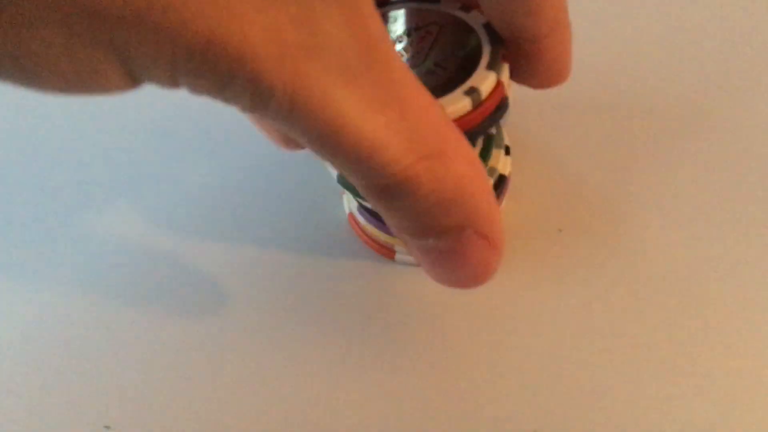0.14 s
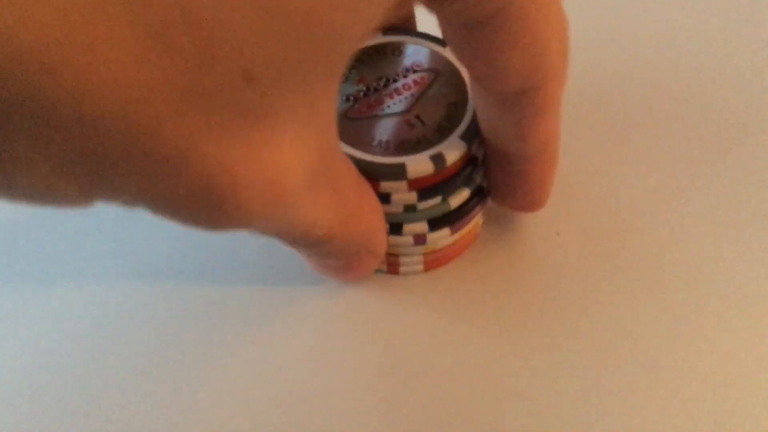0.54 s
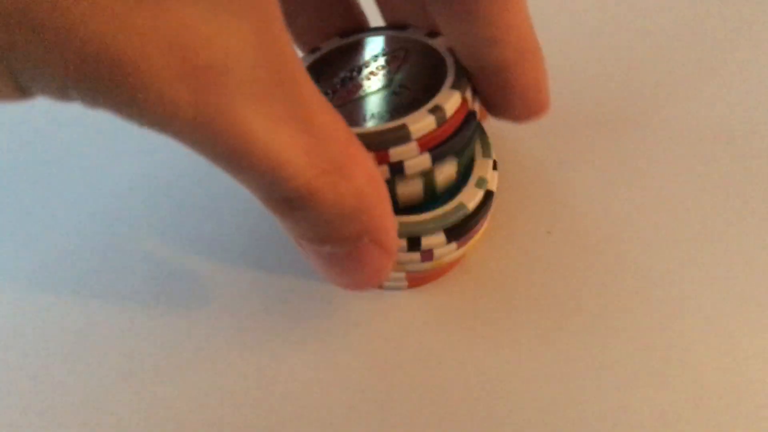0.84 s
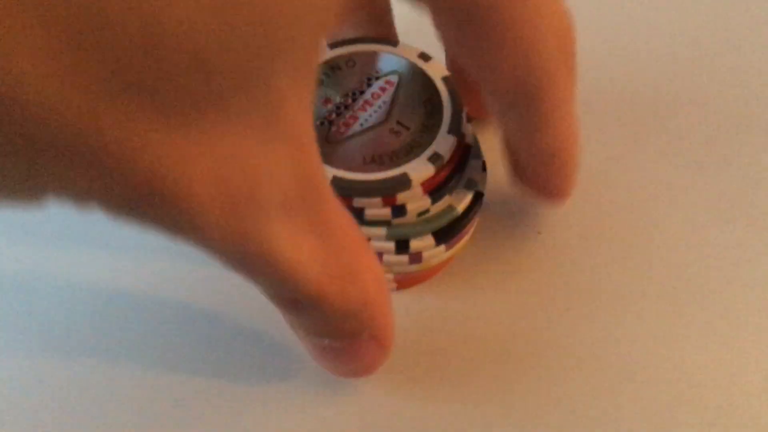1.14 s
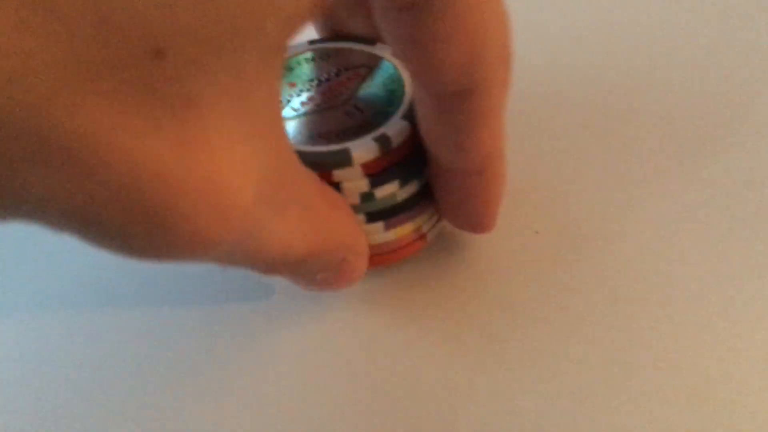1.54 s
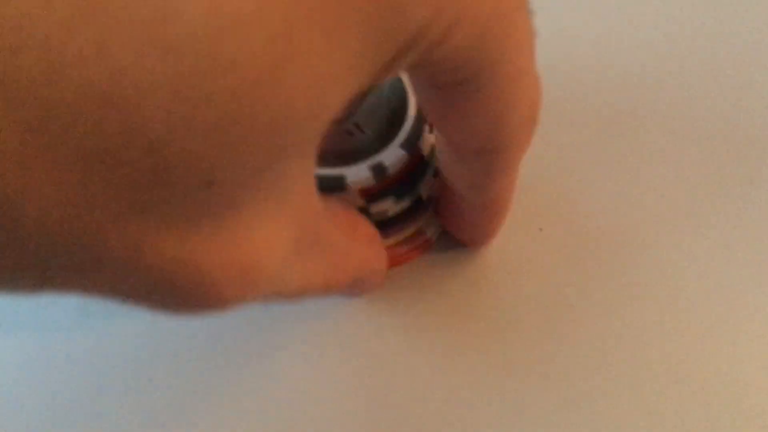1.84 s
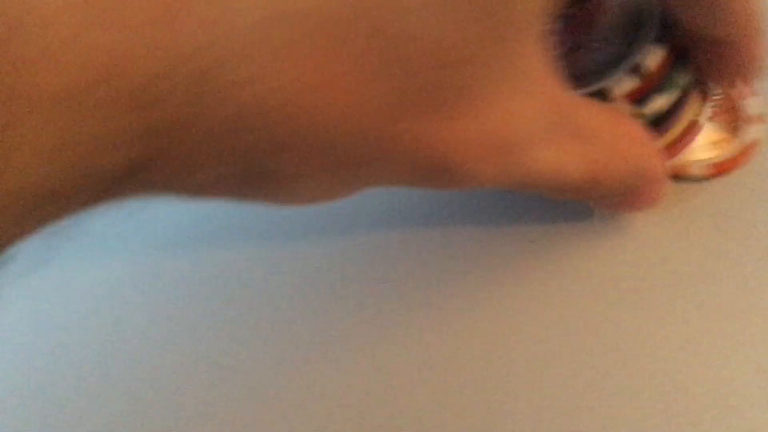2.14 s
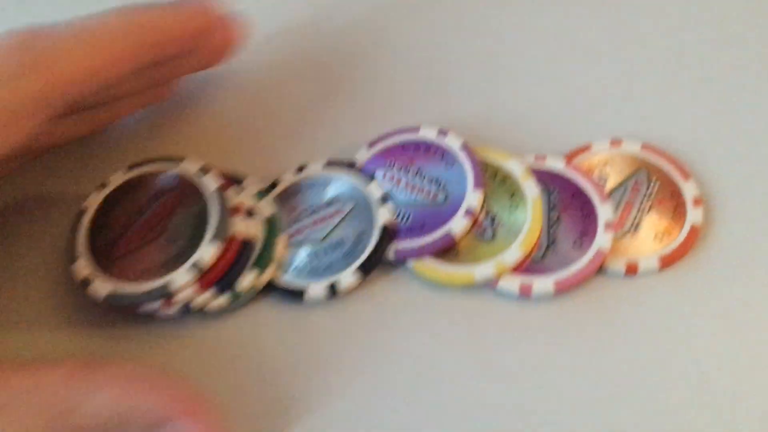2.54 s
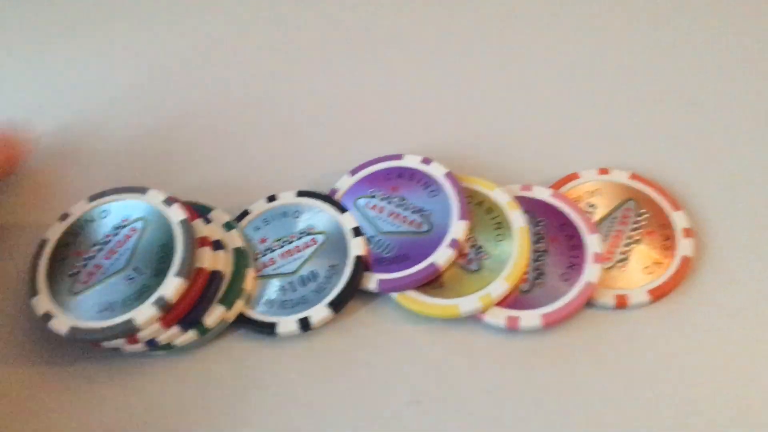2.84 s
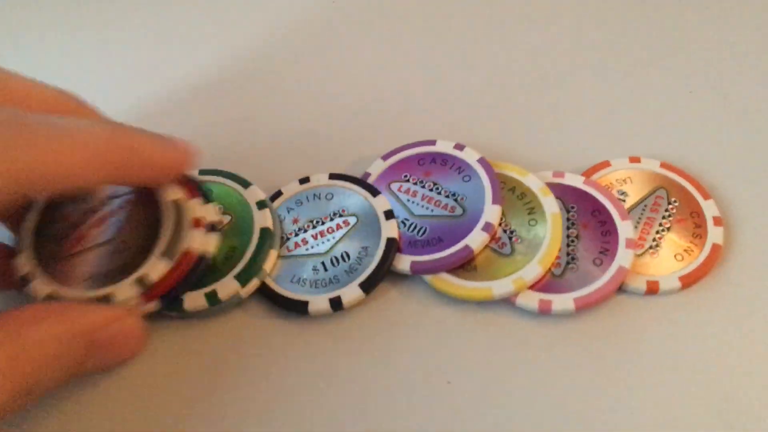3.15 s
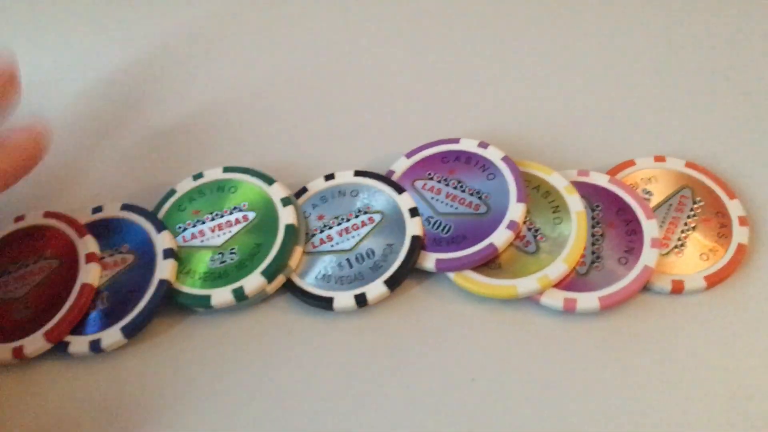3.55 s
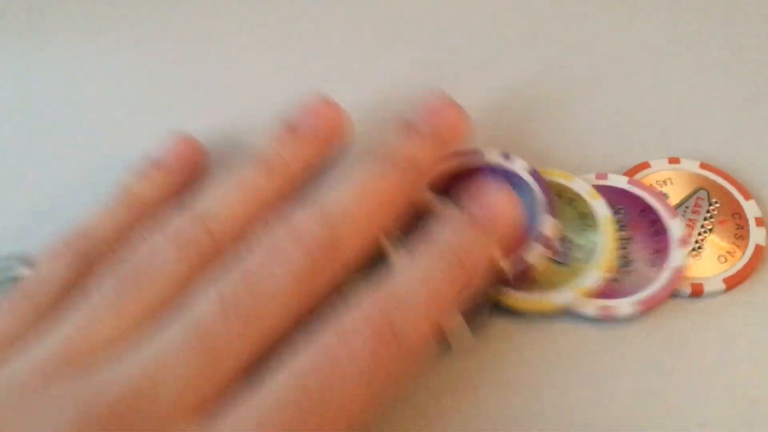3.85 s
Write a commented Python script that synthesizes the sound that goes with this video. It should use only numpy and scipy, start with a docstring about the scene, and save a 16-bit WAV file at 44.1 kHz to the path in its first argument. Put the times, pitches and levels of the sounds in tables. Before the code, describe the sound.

Poker chips clack on a table, close and dry in a small room. A dense, brightening clatter fills 0-0.37 s; looser clacks with stack thuds follow at 0.84-1.13, then a few knocks at 1.68-1.84. A hard crack at 2.2 leads into short scrapes and faint groans until 2.65. After quiet, chips spill in a tight ringing burst at 3.37-3.45, one click at 3.6, then rubbing from 3.8. Faint handling rumble beneath.

```python
"""Plastic poker chips clack on a table, close up, in a small room: a hand lifts a stack, lets the chips fall
back in three runs, smears the stack into a row, topples the rest and starts to gather them.
Each contact cracks as shaped noise, rings the chips and knocks the table top as damped modes.
Sliding chips rush as coloured noise, pressed ones groan as they stick and slip, the stack thuds as it settles.
Handling rumble, room air and a faint wavering hum lie beneath."""
import sys
import numpy as np
from scipy import signal
from scipy.fft import rfft, irfft, next_fast_len
from scipy.io import wavfile
from scipy.ndimage import uniform_filter1d, map_coordinates

SR = 44100
rng = np.random.default_rng(int(sys.argv[2]) if len(sys.argv) > 2 else 0)


def output_pcm(signal):
    """Save a mono or channel-first signal as 16-bit PCM at the path in sys.argv[1].

    Samples are clipped to [-1, 1] before scaling.
    """
    pcm = np.clip(np.atleast_2d(signal).T, -1, 1) * 32767
    wavfile.write(sys.argv[1], SR, np.round(pcm).astype(np.int16))


N = 176400  # length of the scene in samples
T = np.arange(SR // 3) / SR  # time within one contact [s]

# chip contacts; levels are energy over 1 ms, before the trims below:
# (time [s], table knock [dB], clack [dB], crack [dB], chip ring [dB], treble snap [dB], T60 of the impact [s])
CONTACTS = [(0.0339, -30, -26, -26, -38.5, -42.5, 0.004), (0.0852, -13, -19.5, -18, -40, -22, 0.015),
            (0.1316, -18, -14, -22.5, -29, -23, 0.016), (0.1531, -20, -35.5, -20.5, -23, -29.5, 0.095),
            (0.1746, -20, -13, -18, -16.5, -16, 0.033), (0.1791, -22, -17.5, -23, -13, -19.5, 0.052),
            (0.1869, -21.5, -36, -21.5, -28, -16.5, 0.031), (0.198, -20, -13, -16.5, -13, -20, 0.031),
            (0.2266, -20.5, -19.5, -22.5, -36.5, -28, 0.037),
            (0.2512, -18, -23.5, -21.5, -4.5, -20, 0.0085), (0.281, -17, -17.5, -17, -13, -16, 0.03),
            (0.3089, -19.5, -21.5, -20.5, -11.5, -16.5, 0.017),
            (0.3288, -15.5, -15, -15.5, -16.5, -22.5, 0.017), (0.3511, -19, -24, -19.5, -9.5, -16.5, 0.012),
            (0.354, -40.5, -36.5, -14, -7.5, -23, 0.0085), (0.3591, -38.5, -35.5, -15, -7, -15.5, 0.02014),
            (0.3629, -22.5, -26.5, -16, -7.5, -20, 0.013), (0.8375, -14, -15.5, -16, -20.5, -18.5, 0.0099),
            (0.8449, -21, -31, -26, -50.5, -32, 0.0077), (0.865, -17.5, -12.5, -22.5, -42.5, -23.5, 0.01),
            (0.902, -19, -13, -21.5, -34.5, -18.5, 0.0017), (0.9125, -30, -34.5, -33.5, -43.5, -35, 0.008),
            (0.9224, -22.5, -18.5, -22.5, -32, -24, 0.014), (0.9692, -19.5, -26, -27.5, -28.5, -32, 0.019),
            (1.002, -21.5, -16, -20.5, -16.5, -21.5, 0.0098), (1.0698, -20.5, -24, -23, -21.5, -22, 0.019),
            (1.098, -40, -21.5, -16, -15.5, -21, 0.029), (1.1043, -25.5, -29, -25, -29, -26.5, 0.0044),
            (1.1316, -29, -28.5, -21.5, -18.5, -26.5, 0.011),
            (1.68, -12.5, -21.5, -16, -21.5, -20.5, 0.012), (1.7432, -23, -18.5, -20, -26, -28, 0.0068),
            (1.8097, -16.5, -17, -19.5, -26, -25, 0.017), (1.8356, -31.5, -33.5, -34, -32.5, -35.5, 0.012),
            (2.2163, -10.5, -14.5, -14.5, -16, -14.5, 0.054), (2.2936, -11, -15.5, -19, -21, -16, 0.012),
            (2.3098, -28.5, -22, -22.5, -13, -21.5, 0.012),
            (2.3143, -20.5, -16.5, -19.5, -22.5, -31, 0.032), (2.3937, -15.5, -49.5, -29, -32, -31, 0.0065),
            (2.4092, -29, -28.5, -31, -50, -36, 0.007), (2.474, -21.5, -38.5, -37.5, -34.5, -45, 0.027),
            (2.5181, -29.5, -39.5, -36.5, -39, -52, 0.014), (3.3749, -16, -10.5, -30, -11, -22.5, 0.022),
            (3.378, -17.5, -21.5, -14, -9.5, -22, 0.063), (3.388, -17.5, -21, -33, -10.5, -15.5, 0.0072),
            (3.394, -18.5, -16, -26.5, -8, -19, 0.0075), (3.398, -17, -14, -9.5, -3.5, -10.5, 0.013),
            (3.4092, -17, -17, -15, -8.5, -17, 0.028), (3.4159, -34, -18.5, -16, -11, -26, 0.06),
            (3.4289, -23.5, -18.5, -27.5, -28, -39.5, 0.016), (3.452, -27, -24, -25, -33, -34.5, 0.021),
            (3.6074, -23, -16, -18.5, -30.5, -19, 0.022), (3.801, -30, -25.5, -28.5, -53, -43.5, 0.006),
            (3.859, -29, -24.5, -30.5, -38, -38, 0.021)]
# the stack settles heavily on the table: (time [s], level [dB])
STACK_THUDS = [(0.337, -29), (0.364, -21), (0.921, -17.5), (1.003, -20), (1.09, -22.5), (1.814, -14.5)]
# ringing modes of a chip: (frequency [Hz], relative level [dB])
CHIP_MODES = [(5950, -12), (6330, -14.5), (6590, -1), (7030, -7.5)]
# modes of the table top: (frequency [Hz], relative level [dB], T60 [s])
TABLE_MODES = [(261, -16.5, .14), (501, -11.5, 0.045), (781, -7, 0.043), (816, -5, 0.069),
               (1016, -8.5, 0.051), (1176, -2, 0.04), (1440, -4.5, 0.018), (1646, -15, 0.037),
               (2300, -8, 0.034)]
# slow modes of the whole table: (frequency [Hz], relative level [dB], T60 [s])
FRAME_MODES = [(91.1, 1, 0.35), (92.4, -1.5, 0.23), (131.3, -5, 0.23), (165.5, -7, 0.42), (216, -4, 0.17)]
# chips sliding; levels are before SLIDE_DB:
# (time [s], length [s], first level [dB], last level [dB], centre of the rub [Hz], brightness [dB per octave])
SLIDE_EVENTS = [(.49, 0.081, -61.5, -59, 596, 0.5), (1.322, 0.044, -52.5, -52.5, 700, 0.5),
                (1.889, 0.026, -34.5, -48.5, 803, -2.5), (2.013, 0.061, -57, -50, 850, 1),
                (2.151, .05, -37.5, -43.5, 1300, 1), (2.41, 0.12, -38.5, -47, 600, 0.5),
                (2.462, 0.014, -36.5, -44.5, 1215, 3), (2.515, 0.15, -54, -55.5, 1010, 0),
                (3.149, 0.047, -44, -58, 2100, -1.5), (3.169, 0.29, -66.5, -41, 892, .5),
                (3.451, 0.19, -44, -51, 1110, 1), (3.792, 0.096, -34.5, -39, 1710, 1.5),
                (3.86, 0.14, -33, -39.5, 1720, 1.5)]
# colour of the sliding rush: (frequency [Hz], level [dB])
SCRAPE_COLOUR = [(120, -18), (450, 2.5), (1800, -6), (3200, -9.5), (7000, -12.5), (8100, -18),
                 (9600, -18.5), (16000, -39)]
# resonances of chips pressed flat on the table: (frequency [Hz], width [Hz], level [dB])
PRESSED_RESONANCES = [(285, 120, -3), (487.5, 14, 12), (798, 30, 4), (1052, 24, 4), (1287, 70, -9),
                      (1674, 85, 4.5), (2380, 48, -3.5), (6600, 700, -25)]
# chips dragged under pressure: (time [s], length [s], level [dB], resonance [Hz])
DRAG_EVENTS = [(2.176, 0.024, -33.5, 860), (2.29, 0.019, -38, 282), (2.335, 0.12, -43.5, 251.3),
               (2.51, 0.12, -43, 269.4), (2.625, 0.064, -52.5, 480), (3.862, 0.12, -41, 647),
               (3.872, 0.086, -44.5, 1710)]
# swells of the low handling rumble: (time [s], level [dB])
HANDLING_LEVEL = [(0, -50.5), (.25, -41), (.45, -53), (.78, -62), (1.0, -37.5), (1.27, -68), (1.34, -48.5),
                  (1.6, -67.5), (1.9, -49), (2.55, -58.5), (2.76, -72), (3.1, -71.5), (3.5, -56),
                  (4, -59.5)]
# colour of the handling rumble: (frequency [Hz], level [dB])
RUMBLE_COLOUR = [(30, -19.5), (90, 1), (200, -11), (280, -2.5), (400, -18), (3000, -59)]
# colour of the room air: (frequency [Hz], level [dB])
AIR_COLOUR = [(20, -8.5), (36, -3), (70, -1.5), (140, -9), (400, -18.5), (2000, -26), (16000, -36.5)]
# bands of the hum: (frequency [Hz], level [dB])
HUM_BANDS = [(140, -65.5), (310, -65.5)]
# decay of the room: (frequency [Hz], T60 [s])
ROOM_DECAY = [(100, 0.23), (1000, 0.32), (6500, 0.22), (14000, 0.14)]
# energy of the room tail against the dry sound: (frequency [Hz], level [dB])
ROOM_LEVEL = [(100, -9.5), (1500, -10), (3500, -12), (6500, -18), (10000, -18), (15000, -18.5)]

# the rims touch lightly just before the faces slap together
GRAZE_S, GRAZE_DB, SLAP_DB = 0.0006, -16, 1.5
AFTER = np.maximum(T - GRAZE_S, 0)  # time since the faces met [s]
RISE_SHARE = 0.06  # rise time of an impact as a share of its T60
CHATTER_DB, CHATTER_HZ = 1.5, 2840  # the rims touch several times within one contact
MUFFLED_DB = -12  # share of the slap that passes the stack
SCATTER_T60_S = 0.018  # T60 of the impact as the room hears it
CRACK_DB, SNAP_DB, RING_DB = 1, 2, -2  # trims on the contact levels
CHIP_T60_S, RING_SCATTER, CHIP_SPREAD_DB = 0.013, 0.0037, 3

KNOCK_DB, KNOCK_RISE_S, TABLE_SCATTER, TABLE_SPREAD_DB = -3, 0.0041, 0.02, 2
CLUNK_DB, CLUNK_T60_S = -2.5, 0.047
BODY_DB, BODY_T60_S = -6.5, 0.093  # the dull knock of the table
# above a firm knock the clunk gains and the body loses [dB per dB]
FIRM_DB, CLUNK_GROWTH, BODY_SHRINK = -16.5, 0.47, 0.25
THUMP_DB, THUMP_RISE_S = -10.5, 0.01

SLIDE_DB, SLIDE_ATTACK_S, SLIDE_RELEASE_S = 3, 0.011, 0.028
RUB_OCTAVES, RUB_LIFT_DB = 1, 7  # width and height of the lift around the rub's centre
GRIT_PER_S, GRIT_DB = 220, 1  # fine catches in the rub
SCRAPE_RING_DB, PATCH_DB = 1, 3.5
SLIPS_PER_S, SLIP_UNEVEN_DB, DRAG_Q = 320, 5, 3.8

AIR_DB, HUM_WIDTH_HZ = -61, 3
WALL_S = 0.003  # delay before the room answers
TOP_HZ, CEILING = 15950, 0.75  # band limit and peak limit of the recorder


def clacks():
    """Chip hits chip: an impact and a short ring, while the blow passes down the stack into the table."""
    out = np.zeros(N)
    chip_modes = [(hz, db, CHIP_T60_S) for hz, db in CHIP_MODES]
    for s, knock_db, clack_db, crack_db, ring_db, snap_db, t60 in CONTACTS:
        chip = amp(ring_db + RING_DB) * ring(chip_modes, 0.00028, RING_SCATTER, CHIP_SPREAD_DB)
        ringing = chip + amp(knock_db) * table_knock(knock_db)
        direct = impact(clack_db, crack_db, snap_db, t60, SLAP_DB)
        # smeared by the hand and the table on its way into the room
        scattered = impact(clack_db, crack_db, snap_db, SCATTER_T60_S, MUFFLED_DB)
        add(out, s, in_room(direct + ringing, scattered + ringing))
    return out


def impact(clack_db, crack_db, snap_db, t60, slap_db):
    """The dry sound of plastic on plastic: damped noise in three registers."""
    clack = amp(clack_db) * burst(1600, 2850, t60, slap_db)
    crack = amp(crack_db + CRACK_DB) * burst(3350, 6260, t60, slap_db)
    snap = amp(snap_db + SNAP_DB) * burst(7150, 12600, 0.98 * t60, slap_db)
    return clack + crack + snap


def table_knock(knock_db):
    """The table answers a blow with modes and dull noise; hard knocks are brighter."""
    above_firm_db = knock_db - FIRM_DB
    top = amp(KNOCK_DB) * ring(TABLE_MODES, KNOCK_RISE_S, TABLE_SCATTER, TABLE_SPREAD_DB)
    clunk_gain = amp(CLUNK_DB + CLUNK_GROWTH * above_firm_db)
    clunk = clunk_gain * burst(790, 1680, CLUNK_T60_S, MUFFLED_DB)
    body_gain = amp(BODY_DB - BODY_SHRINK * above_firm_db)
    body = body_gain * burst(245, 620, BODY_T60_S, MUFFLED_DB)
    thump = amp(THUMP_DB) * ring(FRAME_MODES, THUMP_RISE_S, scatter=0.03, spread_db=2.5)
    return top + clunk + body + thump


def burst(lo_hz, hi_hz, t60, slap_db):
    """The rims graze, the faces slap together, then dense, heavily damped modes chatter and die."""
    band = signal.butter(2, [lo_hz, hi_hz], 'band', fs=SR, output='sos')
    grain, touches = rng.standard_normal((2, len(T)))
    chatter_db = CHATTER_DB * np.interp(T * CHATTER_HZ, np.arange(len(T)), touches)
    decay = amp(chatter_db - 60 * AFTER / t60)
    rise = amp(GRAZE_DB) + 1 - np.exp(-AFTER / (RISE_SHARE * t60))
    rattle = signal.sosfilt(band, grain * decay * rise)
    slap = signal.sosfilt(band, signal.unit_impulse(len(T), round(GRAZE_S * SR)))
    return blow(blow(rattle) + amp(slap_db) * blow(slap))


def ring(modes, rise_s, scatter, spread_db):
    """Damped sine modes; each blow weights and detunes them anew."""
    hz, db, t60 = np.transpose(modes)[:, :, None]
    size, tune, phase = rng.standard_normal((3, len(modes), 1))
    tuned_hz = hz * (1 + scatter * tune)
    decay = amp(db + spread_db * size - 60 * AFTER / t60)
    waves = np.sin(2 * np.pi * (tuned_hz * T + phase)) * decay
    return blow(waves.sum(0) * (1 - np.exp(-AFTER / rise_s)))


def thuds():
    """The weight of the stack shakes the slow modes of the whole table."""
    out = np.zeros(N)
    for s, db in STACK_THUDS:
        thud = ring(FRAME_MODES, THUMP_RISE_S, scatter=0.028, spread_db=2.5)
        add(out, s, in_room(amp(db) * thud))
    return out


def sliding():
    """Chips rub over the table and each other: a rush with fine catches, coloured by the pressed chips."""
    out = np.zeros(N)
    hz = np.fft.rfftfreq(len(T), 1 / SR)
    pressed = pressed_response(hz)
    for s, length, first_db, last_db, centre_hz, bright_db in SLIDE_EVENTS:
        catches = (rng.random(len(T)) < GRIT_PER_S / SR) * rng.standard_normal(len(T))
        rub = rfft(rng.standard_normal(len(T)) + amp(GRIT_DB) * unit(catches))
        octaves = np.log2((hz + 10) / centre_hz)
        hump_db = RUB_LIFT_DB * np.exp(-(octaves / RUB_OCTAVES) ** 2)
        rub = rub * amp(hump_db + bright_db * np.maximum(octaves, -1))
        broad = unit(irfft(rub * amp(along(SCRAPE_COLOUR, hz))))
        body = unit(irfft(rub * pressed))
        rush = shifting(broad + amp(SCRAPE_RING_DB) * body)
        # the pressure wavers by about 1 dB
        press_db = np.interp(T, [0, length], [first_db, last_db]) + wobble(90)
        attack = 1 - np.exp(-T / SLIDE_ATTACK_S)
        release = np.exp(-np.maximum(T - length, 0) / SLIDE_RELEASE_S)
        add(out, s, in_room(amp(SLIDE_DB + press_db) * attack * release * rush))
    return out


def pressed_response(hz):
    """Chips pressed flat resonate as band-passes of alternating sign."""
    response = 0
    for k, (centre, width, db) in enumerate(PRESSED_RESONANCES):
        damping = 1j * hz * width
        response = response + (-1) ** k * amp(db) * damping / (centre ** 2 - hz ** 2 + damping)
    return response


def shifting(x):
    """The points of contact move, so patches of the rub's spectrum swell and fade."""
    z = signal.stft(x, nperseg=512)[2]
    field = uniform_filter1d(rng.standard_normal(z.shape), size=4, axis=0)  # smooth over frequency
    field = uniform_filter1d(field, size=7, axis=1)  # smooth over time
    patched = signal.istft(z * amp(PATCH_DB * unit(field)), nperseg=512)[1]
    return unit(patched[:len(x)])


def dragging():
    """A pressed chip sticks and slips unevenly; each slip rings one resonance until the chip stops."""
    out = np.zeros(N)
    for s, length, db, hz in DRAG_EVENTS:
        rate = SLIPS_PER_S * amp(SLIP_UNEVEN_DB * wobble(SLIPS_PER_S))
        slipping = np.diff(np.floor(np.cumsum(rate / SR)), prepend=0)
        slips = slipping * rng.standard_normal(len(T)) * (T < length)
        decay = np.exp(-np.pi * hz * T / DRAG_Q)
        resonance = np.sin(2 * np.pi * hz * T) * decay * (1 - np.exp(-hz * T))
        groan = unit(signal.fftconvolve(slips, resonance)[:len(T)])
        # a short drag is not made louder for being short
        add(out, s, in_room(amp(db) * groan * np.sqrt(length / T[-1])))
    return out


def background():
    """Handling rumble and room air as coloured noise, and a wavering hum as very narrow noise."""
    hum = np.zeros(N)
    for centre, db in HUM_BANDS:
        narrow = filtered(rng.standard_normal(N), lambda hz: 1 / (1 + ((hz - centre) / HUM_WIDTH_HZ) ** 2))
        hum += amp(db) * unit(narrow)
    return level(HANDLING_LEVEL) * noise(RUMBLE_COLOUR) + amp(AIR_DB) * noise(AIR_COLOUR) + hum


def room(x):
    """The diffuse tail after one sound: noise that decays at its own rate in each band."""
    hz, t, z = signal.stft(rng.standard_normal(SR // 2), SR, nperseg=256)
    t60 = along(ROOM_DECAY, hz)[:, None]
    per_energy = np.sqrt(2 * np.log(1000) / (t60 * SR))  # gives each band's decay unit energy
    gain = amp(along(ROOM_LEVEL, hz))[:, None] * per_energy
    tail = signal.istft(z * gain * amp(-60 * t / t60), SR, nperseg=256)[1]
    return signal.fftconvolve(x, np.r_[np.zeros(round(WALL_S * SR)), tail])


def in_room(x, scattered=None):
    """A sound and its tail; the room hears the scattered version if there is one."""
    wet = room(x if scattered is None else scattered)
    return wet + np.pad(x, (0, len(wet) - len(x)))


def amp(db):
    """Decibels to gain."""
    return 10 ** (np.asarray(db) / 20)


def unit(x):
    """Scale to rms 1."""
    return x / np.sqrt(np.mean(x ** 2) + 1e-20)


def blow(x):
    """Scale to the energy of 1 ms at full level."""
    return x / np.sqrt(np.sum(x ** 2) * 1000 / SR + 1e-20)


def along(points, hz):
    """Read a curve of (frequency [Hz], value) points on a log frequency axis."""
    f, v = np.transpose(points)
    return np.interp(np.log(hz + 1), np.log(f + 1), v)


def level(points):
    """Gain per sample from (time [s], level [dB]) points."""
    s, db = np.transpose(points)
    return amp(np.interp(np.arange(N) / SR, s, db))


def wobble(rate):
    """A smooth random curve over one contact, rate knots a second."""
    return map_coordinates(rng.standard_normal(len(T)), [T * rate])


def filtered(x, response):
    """Shape x by a response of frequency."""
    m = next_fast_len(N + SR // 2)
    return irfft(rfft(x, m) * response(np.fft.rfftfreq(m, 1 / SR)), m)[:N]


def noise(colour):
    """Coloured noise of rms 1."""
    return unit(filtered(rng.standard_normal(N), lambda hz: amp(along(colour, hz))))


def add(track, s, x):
    """Mix x in at time s."""
    part = track[max(round(s * SR), 0):][:len(x)]
    part += x[:len(part)]


def scene():
    """Everything at one microphone."""
    return (clacks() + thuds() + sliding() + dragging() + background())[None]


def record(dry):
    """The recorder rounds the highest peaks and keeps nothing above its band limit."""
    rounded = dry[0] / (1 + np.abs(dry[0] / CEILING) ** 6) ** (1 / 6)
    return filtered(rounded, lambda hz: 1 / np.sqrt(1 + (hz / TOP_HZ) ** 160))[None]


dry = scene()
out = record(dry)
output_pcm(out)
```